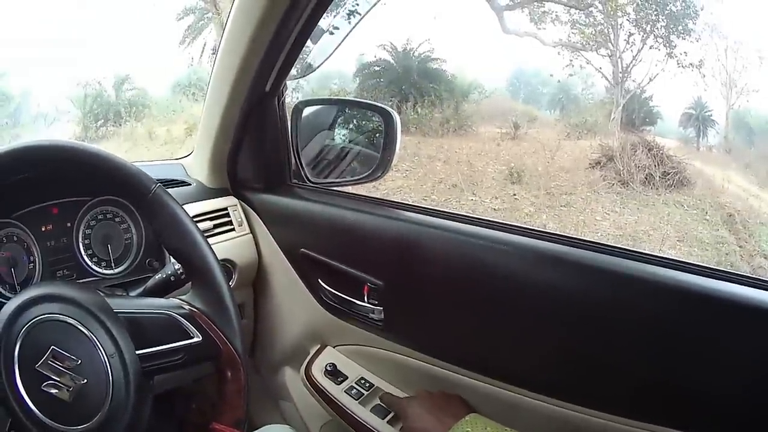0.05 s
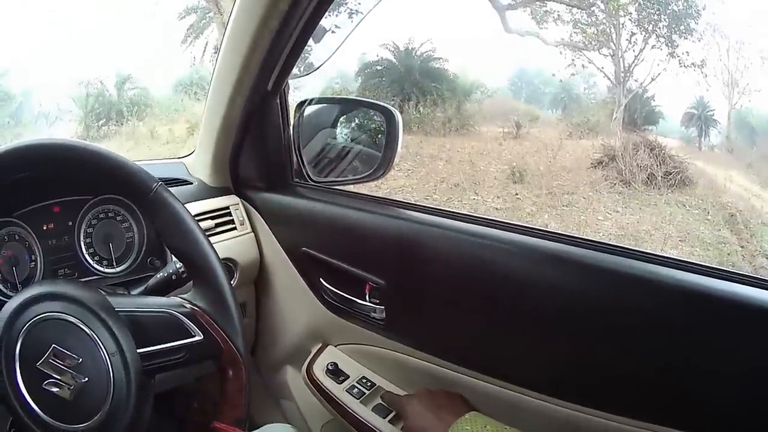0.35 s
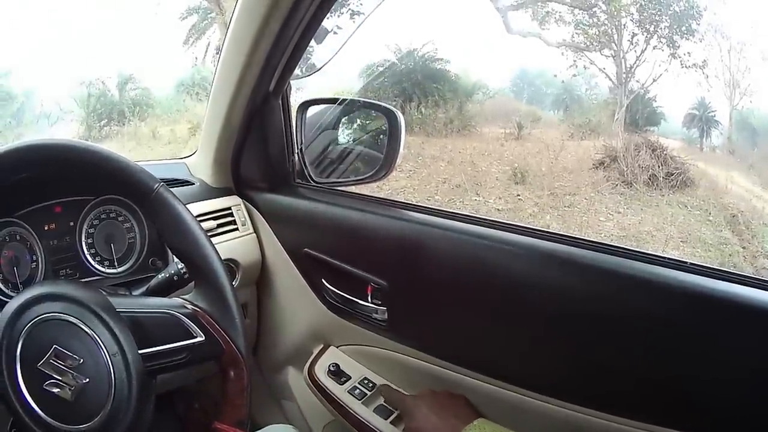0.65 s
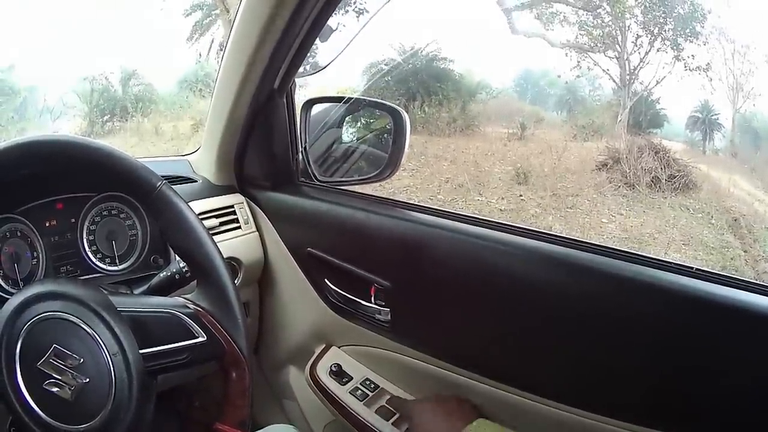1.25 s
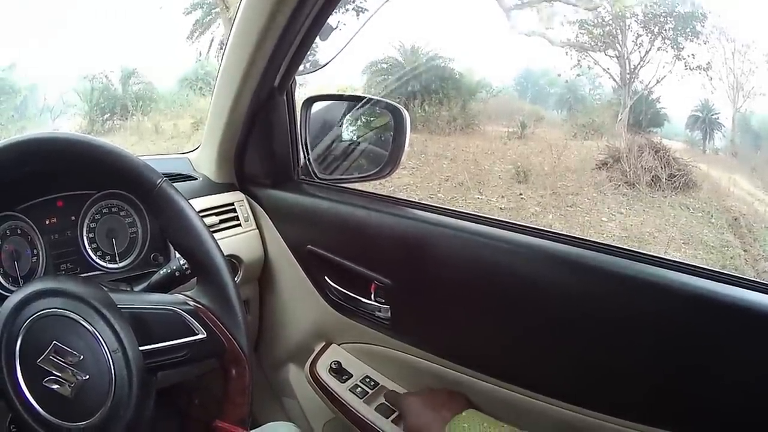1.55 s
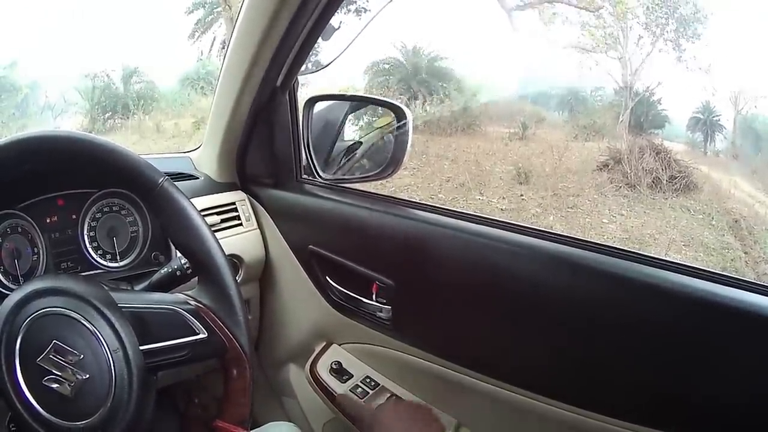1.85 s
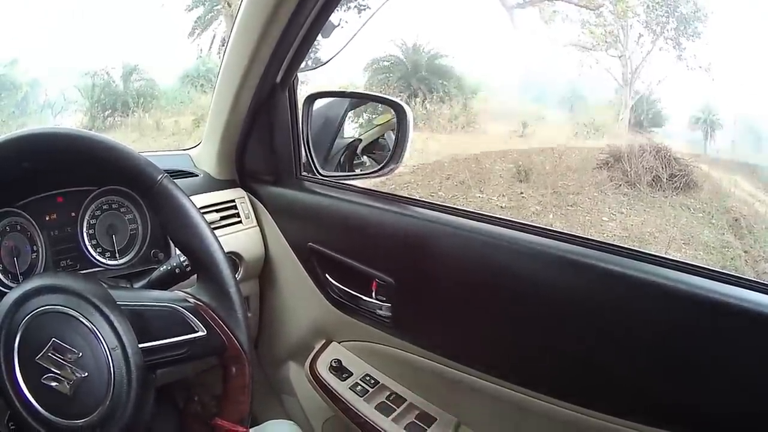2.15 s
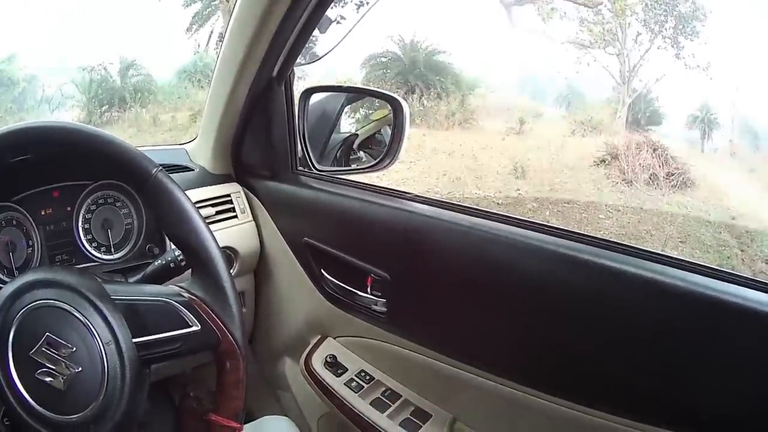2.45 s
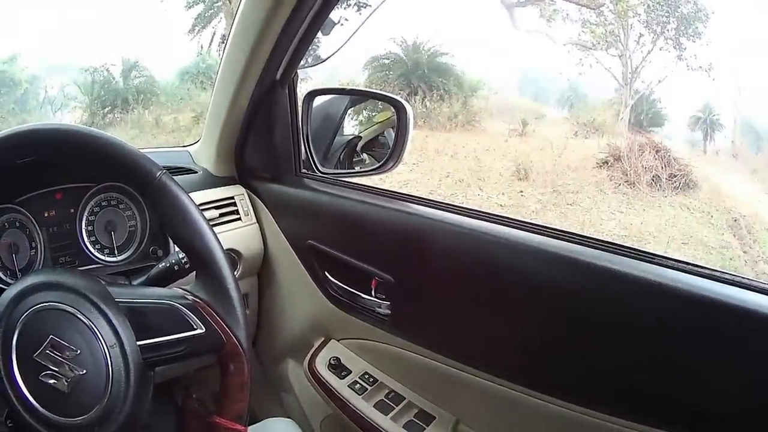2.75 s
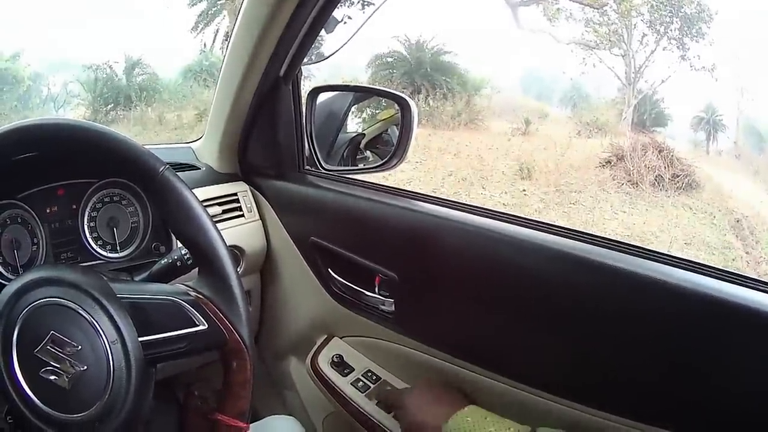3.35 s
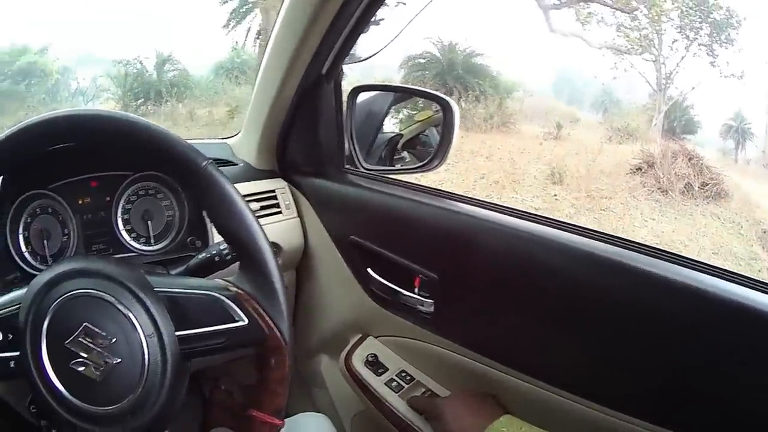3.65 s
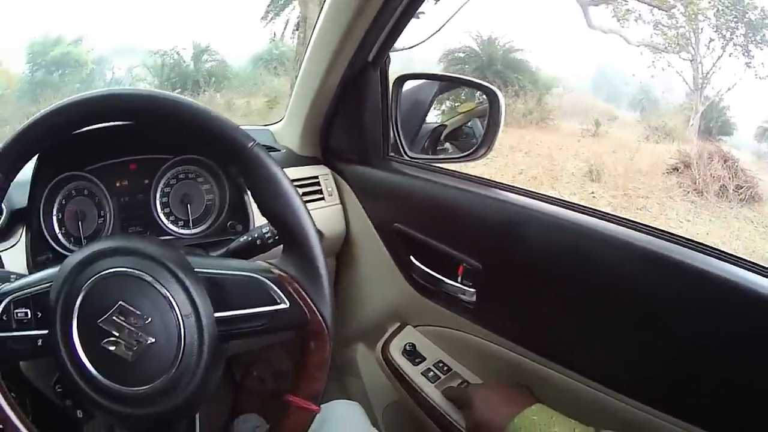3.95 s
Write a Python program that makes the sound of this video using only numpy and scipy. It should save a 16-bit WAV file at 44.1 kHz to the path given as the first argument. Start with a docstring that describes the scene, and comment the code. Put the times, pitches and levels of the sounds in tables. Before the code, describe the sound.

An electric window motor hums briefly inside a parked car, pauses, then runs longer with switch clicks until the glass thuds to a stop. It restarts with a thump and a rubber squeak, heard close over a low rumble.

```python
"""Inside a parked car, an electric window is lowered in two goes until the glass hits its bottom stop;
then the motor starts once more and the rubber seal squeaks. The switch clicks, the gear takes up its
slack with a knock, and each jolt of the glass makes the door and cabin boom. The motor hums and whines
at multiples of its turning speed while the glass hisses along its seals.
Behind it all are a low rumble and two faint, far bird chirps."""
import sys
import numpy as np
from scipy import signal
from scipy.fft import rfft, irfft
from scipy.io import wavfile

SR = 44100
rng = np.random.default_rng(int(sys.argv[2]) if len(sys.argv) > 2 else 0)


def store_pcm(level_fs):
    """Save levels as 16-bit WAV."""
    pcm = np.round(np.clip(level_fs, -1, 1) * 32767).astype(np.int16)
    wavfile.write(sys.argv[1], SR, np.atleast_2d(pcm).T)


N = 176400
T = np.arange(N) / SR

# Tone of the background noise. Each row: frequency in Hz, relative level in dB.
BACKGROUND_TONE = [(38, -2), (46, 9), (56, -6.5), (180, -15), (250, -29), (1300, -37.5), (4000, -51),
                   (15500, -59.5)]
# Swells of the cabin rumble. Each row: time in seconds, boost in dB.
RUMBLE_SWELLS = [(.015, 13.5), (.07, 0), (.5, 6), (1.05, -0.5), (2.7, 1.5), (3.15, 7.5), (3.55, -1.5),
                 (3.85, 4.5)]
# Far birds. Each row: start in seconds, length in seconds, pitch in Hz, level in dB.
CHIRPS = [(3.37, .075, 2570, -65.5), (3.855, 0.037, 2250, -58)]
# The seal's squeak growing. Each row: time in seconds, level in dB.
SQUEAK_LEVEL = [(3.965, -94), (3.995, -37.5)]
# Tones of the squeak. Each row: pitch in Hz, relative level in dB.
SQUEAK_TONES = [(2052, 6), (2560, -2), (3900, -8)]
# Jolts of the door. Each row: start in seconds, strength in dB, length of the push in seconds.
JOLTS = [(0.241, -17, 0.0077), (0.269, -17, 0.0036), (0.323, -12.5, 0.022), (0.783, -20.5, 0.013),
         (1.600, -15.5, 0.0098), (1.647, -16.5, 0.021), (2.965, -8, 0.01), (3.938, -2, 0.029),
         (3.946, -19.5, 0.0021)]
# Modes (natural ringing tones) of door and cabin. A ring time is how long a 60 dB fade takes.
# Each row: pitch in Hz, relative level in dB, ring time in seconds.
CABIN_MODES = [(39.2, 0, 0.76), (50.2, 10.5, 0.14), (84.5, 2, 0.16), (121, -1.5, 0.3), (170.5, -4.5, 0.36)]
# Clunks of the window lifter. Each row: time in seconds, strength in dB, hollow mode's boost in dB.
CLUNKS = [(0.2492, -26, -9), (2.968, -24, -0.5), (2.977, -26, 4.5)]
# Modes of the lifter's rail. Each row: pitch in Hz, relative level in dB.
RAIL_MODES = [(318, -2), (605, -3), (950, -7), (1360, -10), (2520, -10), (4300, -18.5)]
# Knocks of gear and glass. Each row: start in seconds, level in dB, brightness in dB per octave.
KNOCKS = [(0.238, -30.5, -2), (0.247, -24.5, -2.5), (.261, -28.5, 6), (0.763, -22.5, 0), (1.577, -24.5, 0),
          (1.651, -32.5, -1), (2.9655, -24, 6.5), (2.972, -23, -0.5), (3.822, -31.5, -0.5),
          (3.918, -18, 0.5)]
# Tone of a knock. Each row: frequency in Hz, relative level in dB.
KNOCK_TONE = [(100, 3.5), (330, 3), (470, -4.5), (1400, -6.5), (1950, -18), (2550, -10), (3700, -29.5),
              (4600, -22.5), (5800, -43.5), (15000, -78)]
# Clicks from the switch and the hand on it.
# Each row: time in seconds, strength in dB, high modes' boost in dB, hollow low mode's boost in dB.
CLICKS = [(0.7321, -28, 1, -6), (1.6395, -32, 7.5, 10.5), (1.796, -34, -6, 9), (1.819, -34, -11, 10.5),
          (1.898, -24, 4, 3), (1.9061, -26, -4, 3.5), (3.8156, -32, 3, 13), (3.929, -21, -6, -2)]
# Modes of the plastic switch panel. Each row: pitch in Hz, relative level in dB, ring time in seconds.
PANEL_MODES = [(371.6, -11, 0.11), (731, -2.5, 0.065), (912, -10, 0.079), (1870, -16.5, 0.085),
               (2060, -19.5, 0.047), (3212, -11.5, 0.024)]
# Tone of a click's crack. Each row: frequency in Hz, relative level in dB.
CRACK_TONE = [(200, 26.5), (3400, -4), (5500, -13.5), (14000, -59)]
# Hiss of the glass on its seals. Each row: time in seconds, level in dB.
SLIDE_LEVEL = [(1.65, -56), (2.6, -62.5), (3.93, -51.5)]
# Tone of that hiss. Each row: frequency in Hz, relative level in dB.
SLIDE_TONE = [(2000, 13), (9500, -3.5), (15000, -16.5)]
# Runs of the motor. Each row: start and stop in seconds, hum level in dB,
# growl (a boost or cut of the lowest tones) in dB, brush noise level in dB.
MOTOR_RUNS = [(0.249, .775, -46.5, 7, -47.5), (1.589, 2.972, -43, -8.5, -46.5),
              (3.921, 4.1, -43, -2, -38.5)]
# The motor's speed once it is spun up. Each row: time in seconds, turns per second.
FULL_SPEED = [(.42, 97.2), (.62, 96), (1.72, 95.3), (1.88, 94.6), (2.2, 95.7), (2.38, 96.8), (2.75, 98)]
# Tone of the hum. Each row: frequency in Hz, relative level in dB.
HUM_TONE = [(96, 2), (290, -4), (385, -24), (485, -9), (600, -15.5), (2400, -30.5), (5000, -46)]
# Whine of the commutator, the motor's spinning ring of contacts.
# Each row: time in seconds, then the levels in dB of its first, second and third harmonic.
WHINE_LEVELS = [(.5, -54.5, -64, -64), (1.75, -57, -56.5, -67), (2.11, -62, -56.5, -75),
                (2.24, -52, -61, -72), (2.39, -60.5, -53, -61), (2.6, -69, -56.5, -75),
                (2.78, -72, -58.5, -60.5), (2.94, -67, -63, -67)]
# Tone of the brush and gear noise. Each row: frequency in Hz, relative level in dB.
BRUSH_TONE = [(60, 7), (170, 16), (240, -2.5), (340, 10), (450, 2.5), (1600, -7), (2050, -6.5), (3450, -13),
              (3800, -27.5), (5000, -16.5), (6500, -53)]

SEGMENTS = 10  # commutator contacts passing the brushes per turn
SPIN_UP_S, COAST_S, LOAD_S = .02, .02, .03
RING_SHORTENS = 0.31  # how much sooner high tones die than low ones
CUTOFF_HZ = 15800


def amp(db):
    """Turn decibels into a gain."""
    return 10 ** (np.asarray(db) / 20)


def curve(rows):
    """Join (time, value) points with straight lines."""
    return np.interp(T, *np.transpose(rows))


def level_at(tone, hz):
    """Read a tone table's level in dB, on a log-frequency axis."""
    freqs, db = np.transpose(tone)
    return np.interp(np.log(hz + 1e-9), np.log(freqs), db)


def noise(tone):
    """Noise shaped by a tone table, with a spread of 1."""
    gains = amp(level_at(tone, np.fft.rfftfreq(N, 1 / SR)))
    shaped = irfft(rfft(rng.standard_normal(N)) * gains, N)
    return shaped / shaped.std()


def drift(rate_hz):
    """Random wavering, mostly slower than rate_hz, with a spread of 1."""
    hz = np.fft.rfftfreq(2048, N / SR / 2048)
    waver = irfft(rfft(rng.standard_normal(2048)) / (1 + (hz / rate_hz) ** 2))
    return np.interp(T, np.linspace(0, T[-1], len(waver)), waver / waver.std())


def butter(order, hz, kind="low"):
    """Design a smooth filter."""
    return signal.butter(order, hz, kind, fs=SR, output="sos")


def ring(push, hz, ring_s):
    """One mode: each push sets off a fading sine wave."""
    decay, step = amp(-60 / (ring_s * SR)), 2 * np.pi * hz / SR
    return signal.lfilter([0, np.sin(step)], [1, -2 * decay * np.cos(step), decay ** 2], push + 1e-18)


def burst(start, ring_s, rise_s=0.00098):
    """The loudness of a blow: a quick rise, then a fade."""
    age = np.maximum(T - start, 0)
    return (1 - np.exp(-age / rise_s)) * np.exp(-np.minimum(np.log(1000) * age / ring_s, 20))


def taps(times, db):
    """Single pushes at the given times, each of slightly random strength."""
    push = np.zeros(N)
    push[(times * SR).astype(int)] = amp(db + rng.standard_normal(len(times)))
    return push


def background():
    """Faint hiss and a low cabin rumble that swells and dips."""
    bed = amp(-38) * noise(BACKGROUND_TONE)
    rumble = signal.sosfiltfilt(butter(2, 120), bed)
    hiss = bed - rumble
    return hiss + amp(curve(RUMBLE_SWELLS)) * rumble


def birds():
    """Faint, wavering chirps far outside."""
    out = np.zeros(N)
    for start, length, hz, db in CHIRPS:
        swell = np.sin(np.pi * np.clip((T - start) / length, 0, 1))
        out += amp(db) * swell * np.sin(2 * np.pi * hz * T + drift(30))
    return out


def seal_squeak(wobble=0.027):
    """Rubber grips the glass as it turns back, squeaking in a few unsteady tones."""
    tones = np.zeros(N)
    for hz, db in SQUEAK_TONES:
        pitch = hz * (1 + wobble * drift(195))
        tones += amp(db) * np.sin(2 * np.pi * np.cumsum(pitch) / SR)
    started = T > SQUEAK_LEVEL[0][0]
    return amp(curve(SQUEAK_LEVEL)) * started * tones


def cabin_booms():
    """Each jolt is a soft push, sudden at first, into the low modes of door and cabin."""
    push = np.zeros(N)
    for start, db, length in JOLTS:
        progress = np.clip((T - start) / length * 2 * np.pi, 0, 40)
        shape = progress * np.exp(-progress)
        push += amp(db) * shape / shape.sum()
    booms = np.zeros(N)
    for k, (hz, db, ring_s) in enumerate(CABIN_MODES):
        booms += (-1) ** k * amp(db) * ring(push, hz, ring_s)  # neighbours swing opposite ways
    return signal.sosfilt(butter(1, 12, "high"), booms)


def rail_clunks():
    """The lifter's rail rings when the gear snaps tight and when the glass lands on its stop."""
    times, db, hollow_db = np.transpose(CLUNKS)
    out = np.zeros(N)
    for k, (hz, mode_db) in enumerate(RAIL_MODES):
        push = taps(times, db + mode_db + hollow_db * (450 < hz < 700))
        out += (-1) ** k * ring(push, hz, ring_s=0.079 * (hz / 1000) ** -RING_SHORTENS)
    return out


def door_knocks():
    """The parts in the door ring in so many modes that they blur into noise; high ones die first."""
    body, out = noise(KNOCK_TONE), np.zeros(N)
    for hz in 125 * 2 ** np.arange(8):
        edges = [hz / np.sqrt(2), min(hz * np.sqrt(2), CUTOFF_HZ)]
        band = signal.sosfilt(butter(2, edges, "band"), body)
        octave = np.log2(hz / 1000)
        ring_s = 0.14 * 2 ** (-RING_SHORTENS * octave)
        out += band * sum(amp(db + tilt * octave) * burst(start, ring_s) for start, db, tilt in KNOCKS)
    return out


def switch_clicks():
    """Each click cracks and rings the plastic panel; the slightly soft contact dulls the ringing."""
    bursts = sum(amp(db + high / 2) * burst(start, ring_s=0.082) for start, db, high, _ in CLICKS)
    cracks = amp(-1) * noise(CRACK_TONE) * bursts
    times, db, high_db, low_db = np.transpose(CLICKS)
    rings = np.zeros(N)
    for k, (hz, mode_db, ring_s) in enumerate(PANEL_MODES):
        push = taps(times, db + mode_db + high_db * (hz > 1000) + low_db * (hz < 450))
        rings += (-1) ** k * ring(push, hz, ring_s)
    return cracks + signal.sosfilt(butter(2, 4500), rings)


def glass_slide(running):
    """The glass hisses along its seals while the motor runs."""
    return running * amp(curve(SLIDE_LEVEL)) * noise(SLIDE_TONE)


def commutator_whine(angle):
    """Contacts sweeping past the brushes make three flickering high tones."""
    times, *harmonics = np.transpose(WHINE_LEVELS)
    return sum(amp(np.interp(T, times, db) + drift(11)) * np.sin(k * SEGMENTS * angle)
               for k, db in enumerate(harmonics, 1))


def motor_hum(angle, growl_db, load_db, flicker_db=2):
    """The spinning motor hums at multiples of its turning speed."""
    mean_speed = np.mean(FULL_SPEED, axis=0)[1]
    out = np.zeros(N)
    for k in range(1, 55):
        hz = k * mean_speed
        bass_db = growl_db / (1 + (hz / 500) ** 2) + load_db / k
        db = level_at(HUM_TONE, hz) + bass_db + flicker_db * drift(8.5)
        phase = rng.uniform(0, 2 * np.pi)
        if k not in (SEGMENTS, 2 * SEGMENTS):  # the whine supplies these two
            out += amp(db) * np.sin(k * angle + phase)
    return out


def window_motor(sag=0.16, wobble=0.0029):
    """The motor spins up, drives the glass and coasts to rest; its brush noise pulses twice a turn."""
    start, stop, hum_db, growl_db, brush_db = np.transpose(MOTOR_RUNS)[:, :, None]
    age = np.maximum(T - start, 0)
    runs = (1 - np.exp(-age / SPIN_UP_S)) * np.exp(-np.maximum(T - stop, 0) / COAST_S)
    running = runs.sum(0)  # 0 at rest, 1 at full speed
    speed = curve(FULL_SPEED) * (1 - sag * (1 - running)) * (1 + wobble * drift(12.5))
    angle = 2 * np.pi * np.cumsum(speed) / SR
    growls = runs * growl_db
    # The growl's boost or cut is briefly greater as the motor takes up its load.
    load_db = (1.4 * growls * np.exp(-age / LOAD_S)).sum(0)
    hum = (runs * amp(hum_db)).sum(0) * motor_hum(angle, growls.sum(0), load_db)
    whine = running * commutator_whine(angle)
    pulsing = 1 + 0.2 * np.sin(2 * angle)
    brushes = (runs * amp(brush_db)).sum(0) * noise(BRUSH_TONE) * pulsing
    return hum + whine + brushes + glass_slide(running)


def scene():
    """The window's sounds over far birds and the cabin's background, in one channel."""
    window = window_motor() + switch_clicks() + door_knocks() + rail_clunks()
    return (window + cabin_booms() + seal_squeak() + birds() + background())[None]


def record(dry, peak_limit=.95, fade_s=.005):
    """Round off the biggest peaks, fade both ends and cut the highest treble."""
    rounded = dry / (1 + (dry / peak_limit) ** 4) ** .25
    fade = np.sin(np.pi / 2 * np.clip(np.minimum(T, T[-1] - T) / fade_s, 0, 1)) ** 2
    treble_cut = signal.ellip(10, .1, 80, CUTOFF_HZ, fs=SR, output="sos")
    return signal.sosfilt(treble_cut, rounded * fade)


dry = scene()
out = record(dry)
store_pcm(out)
```